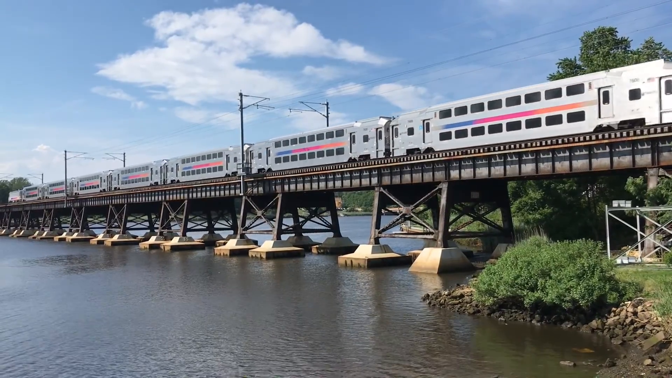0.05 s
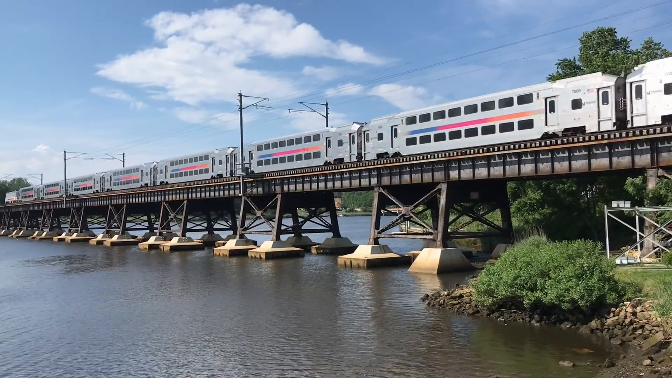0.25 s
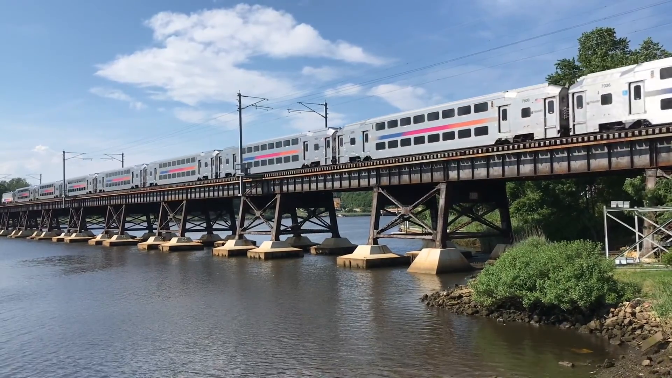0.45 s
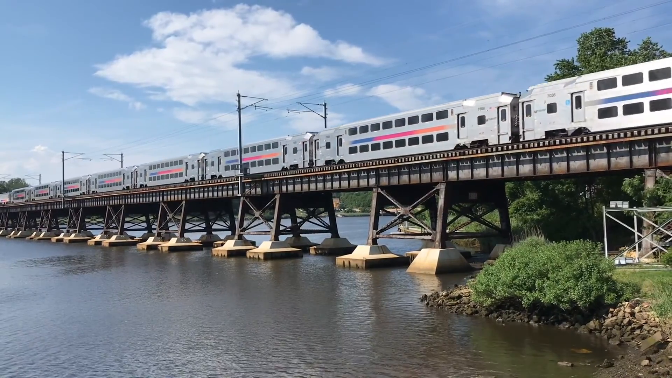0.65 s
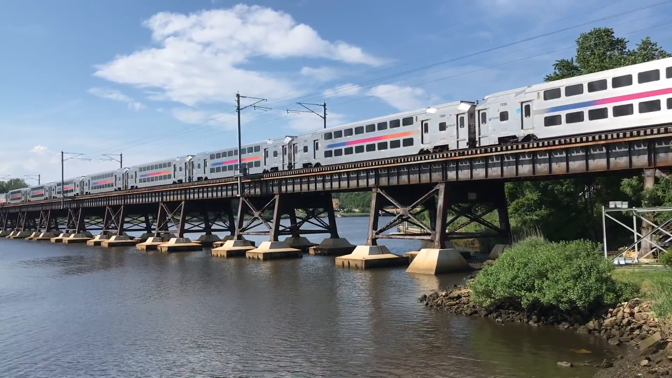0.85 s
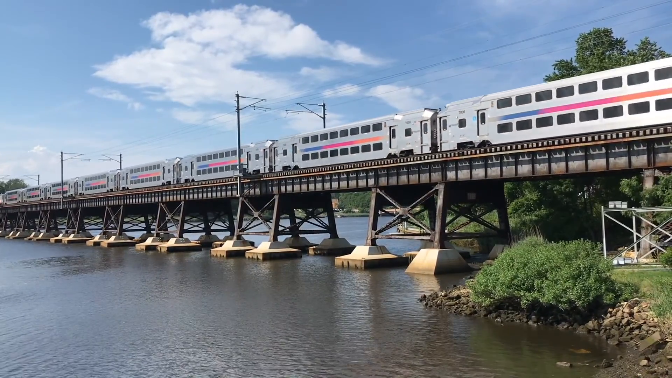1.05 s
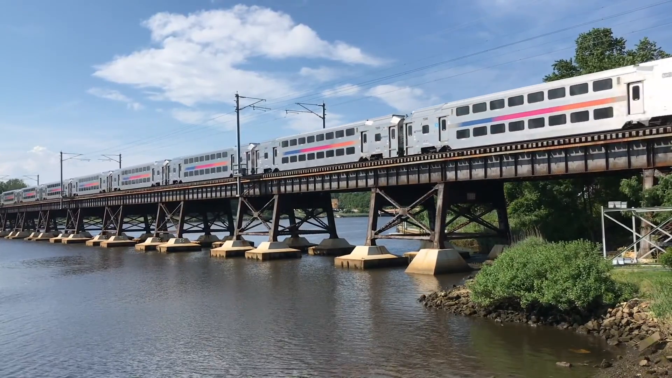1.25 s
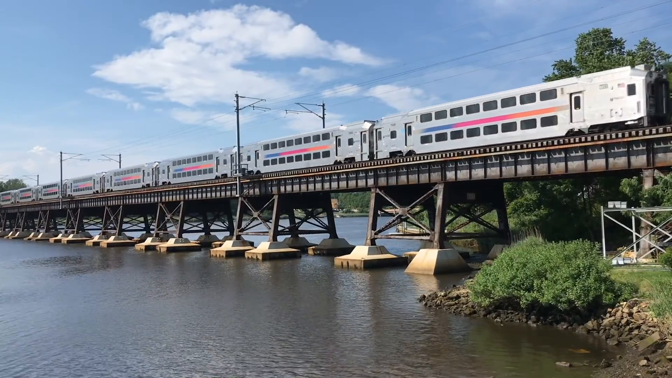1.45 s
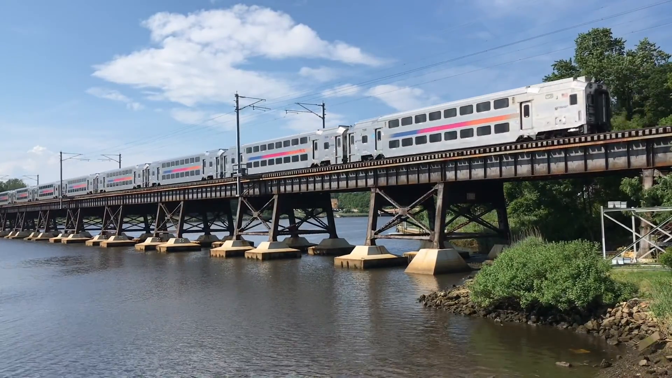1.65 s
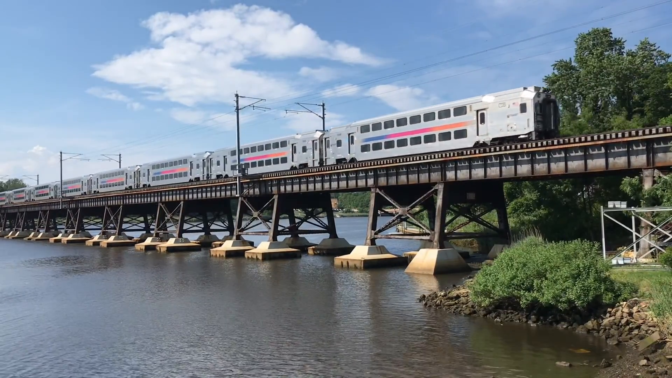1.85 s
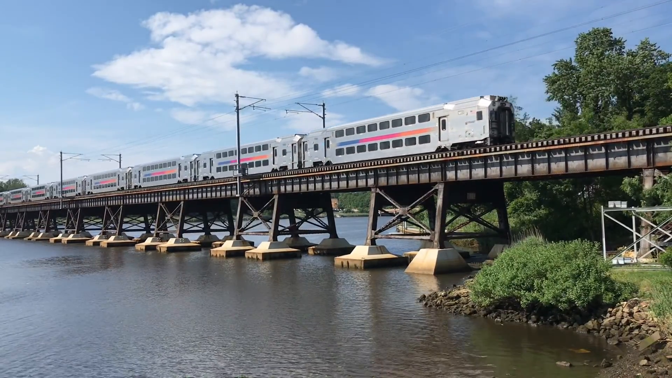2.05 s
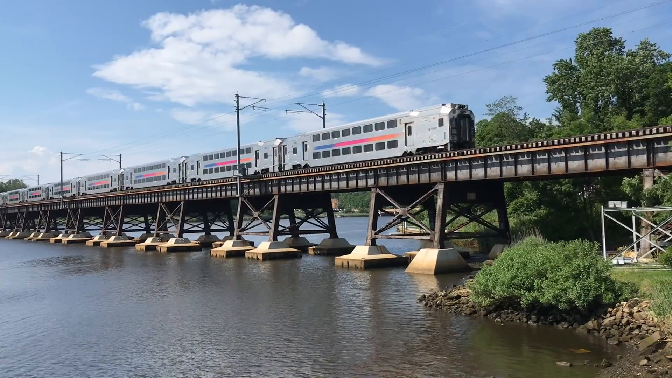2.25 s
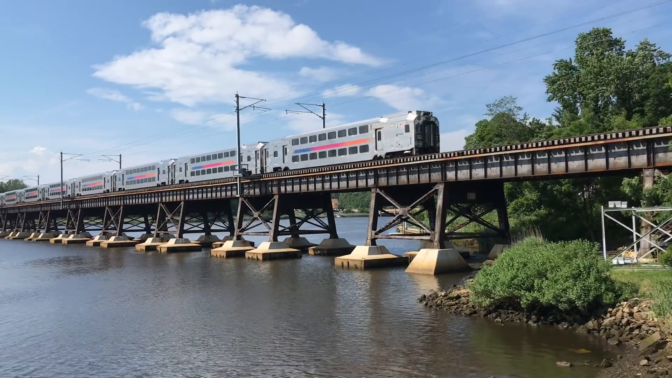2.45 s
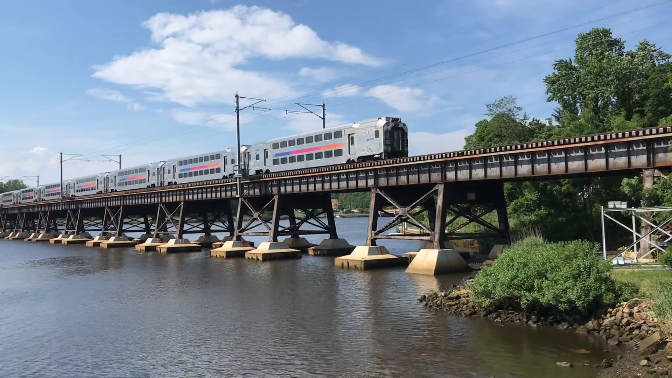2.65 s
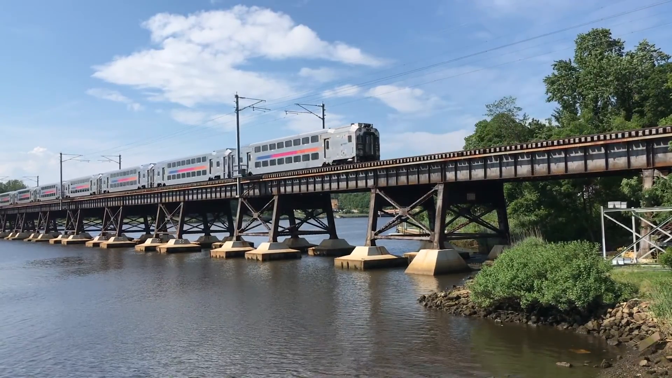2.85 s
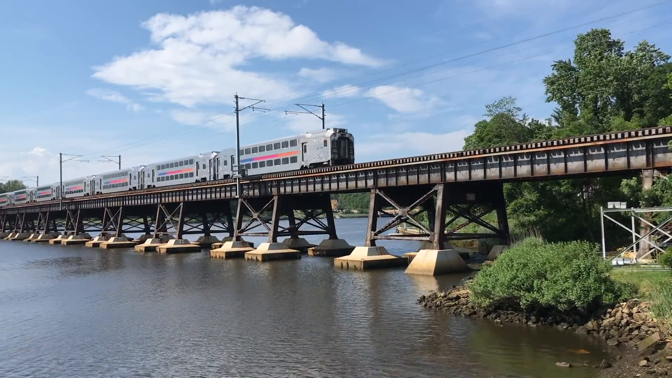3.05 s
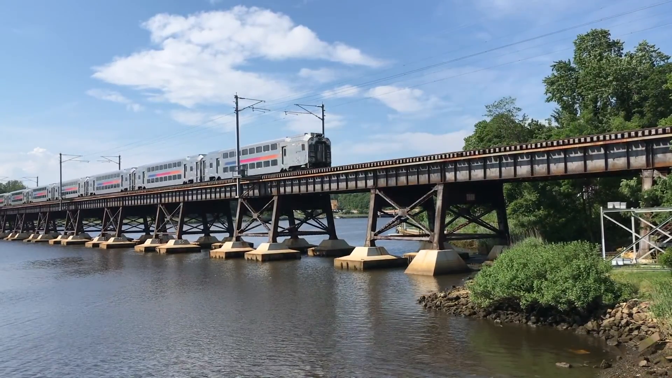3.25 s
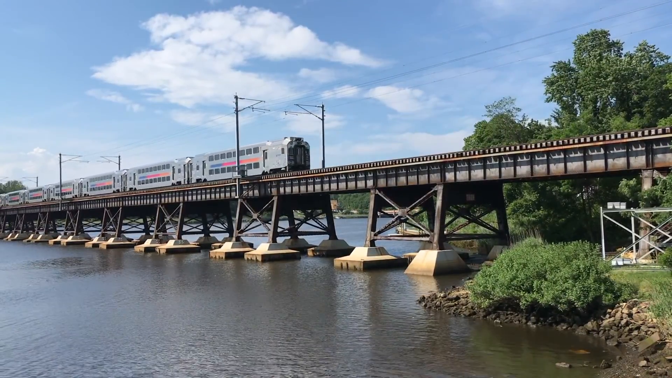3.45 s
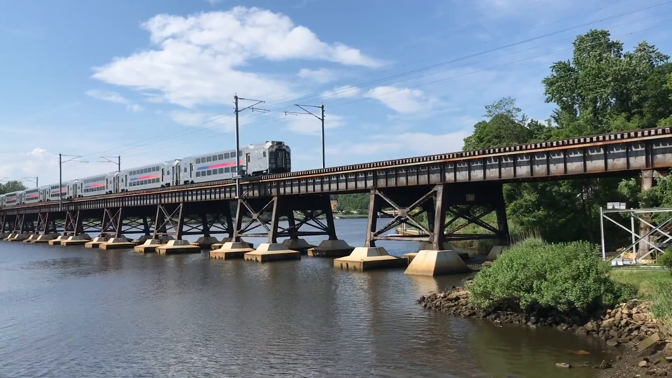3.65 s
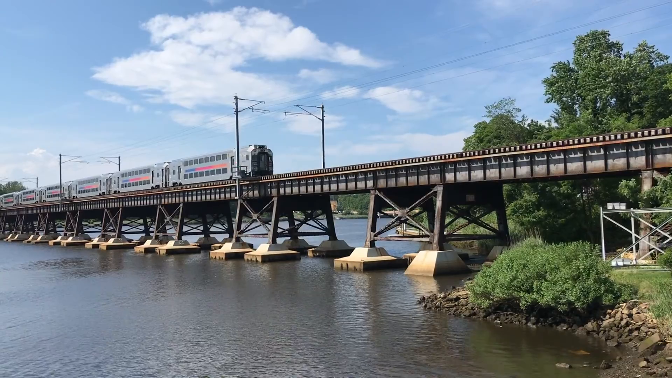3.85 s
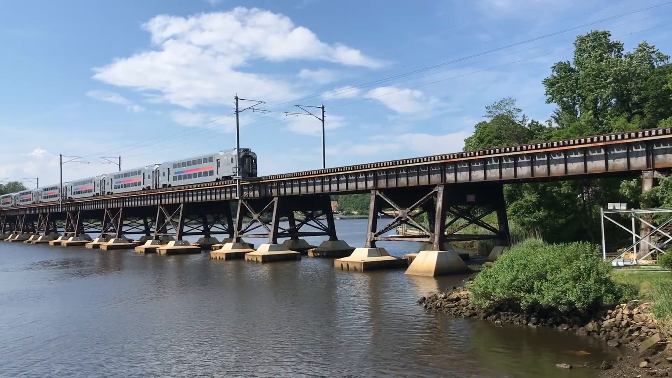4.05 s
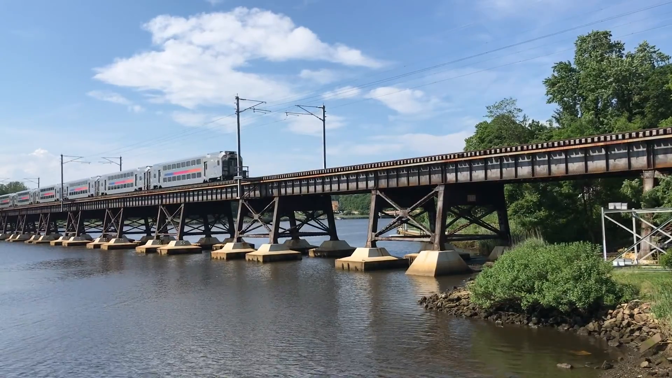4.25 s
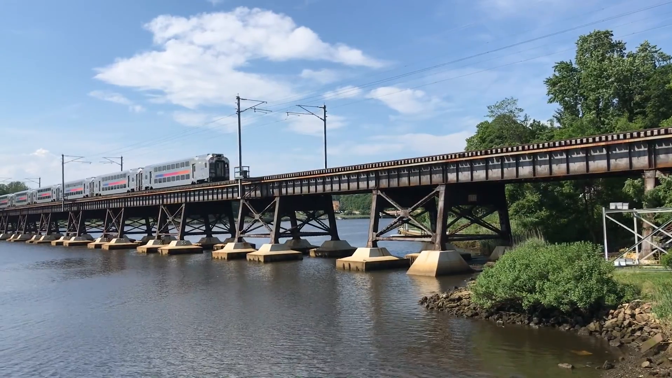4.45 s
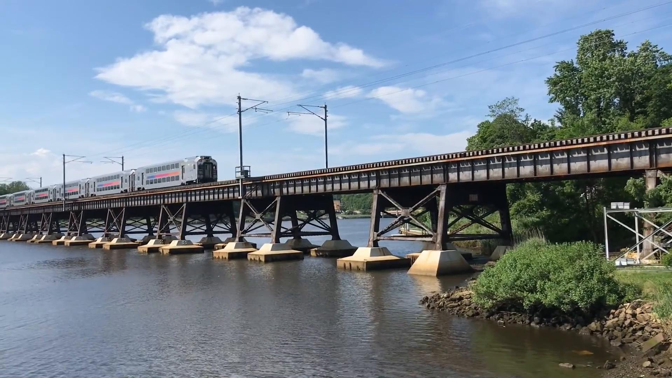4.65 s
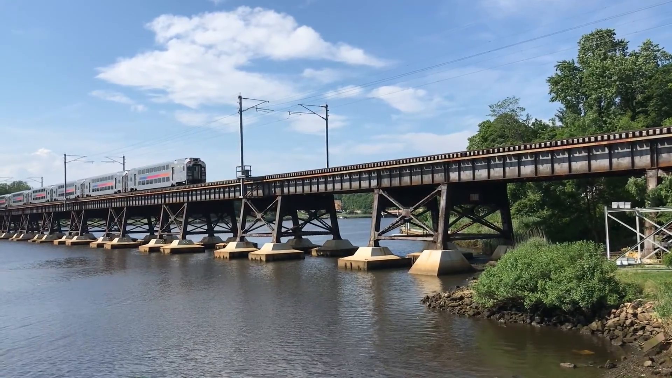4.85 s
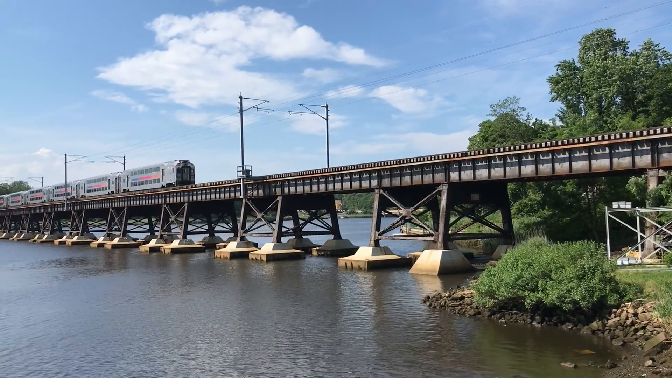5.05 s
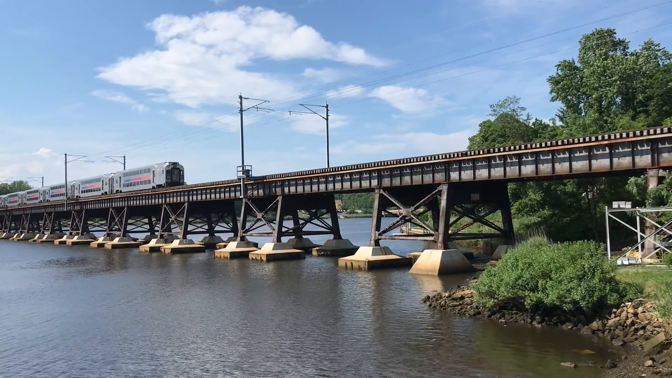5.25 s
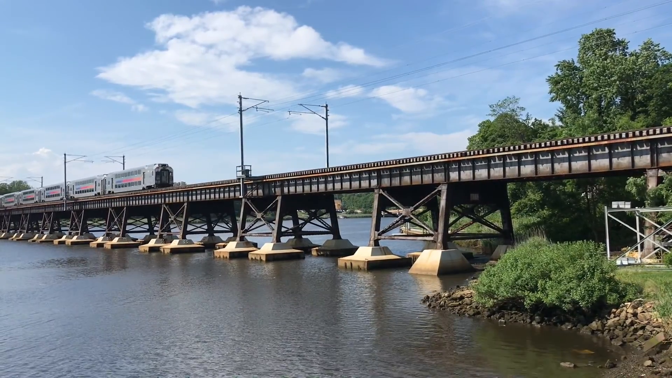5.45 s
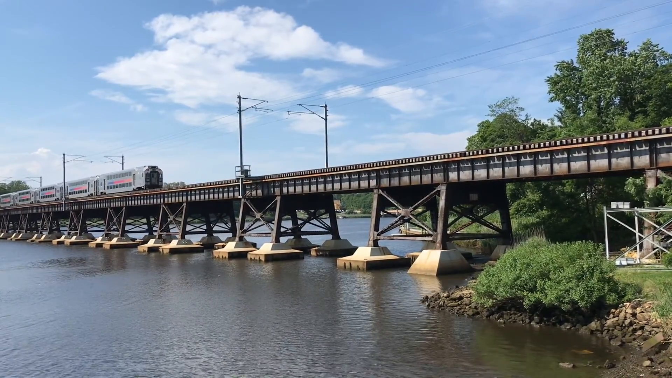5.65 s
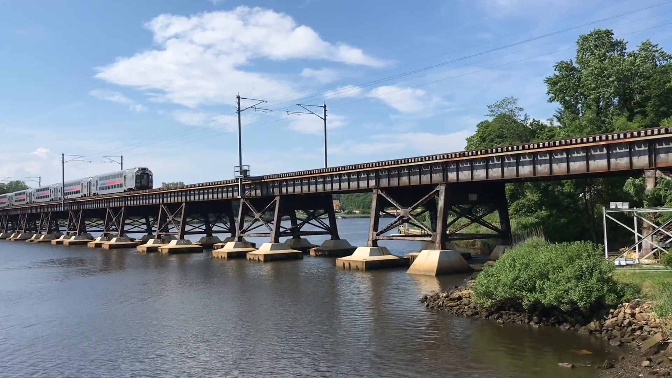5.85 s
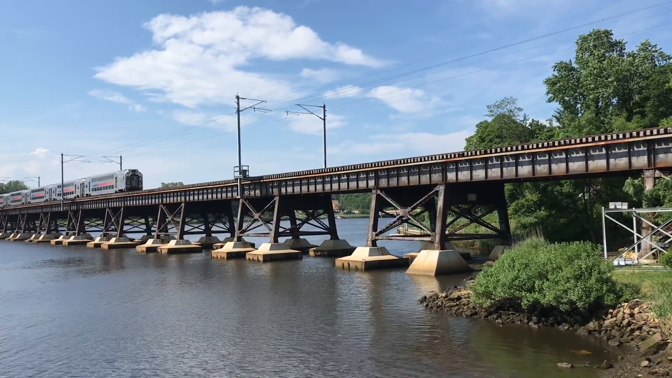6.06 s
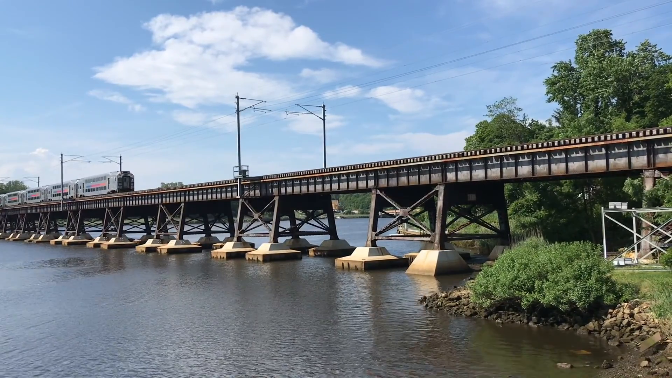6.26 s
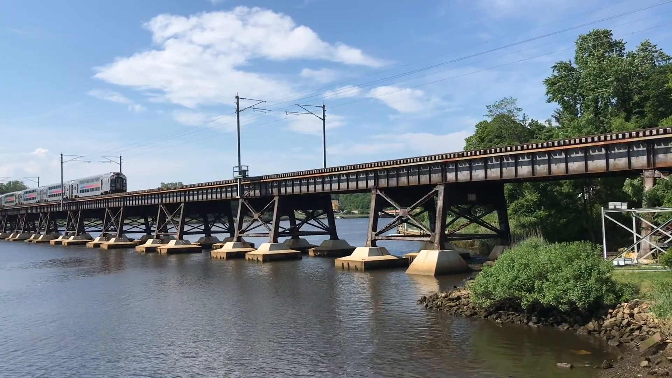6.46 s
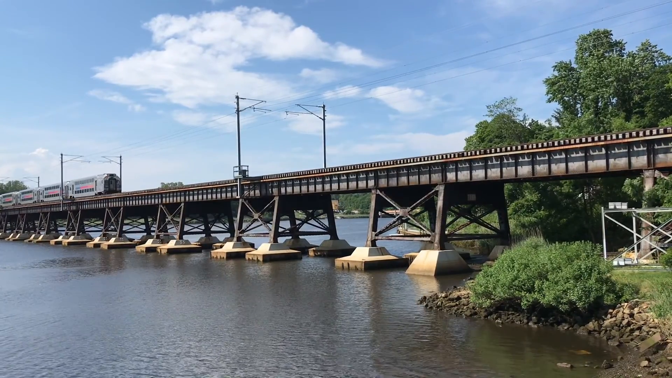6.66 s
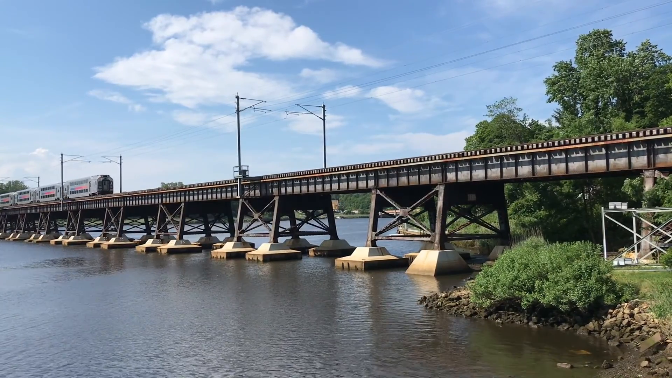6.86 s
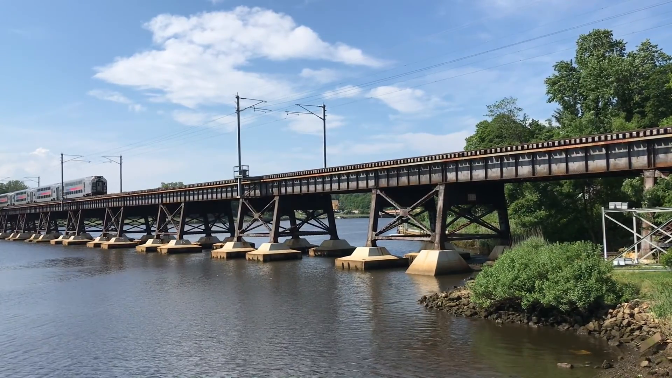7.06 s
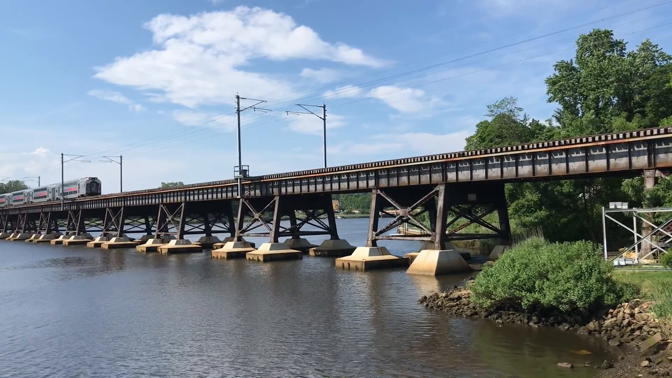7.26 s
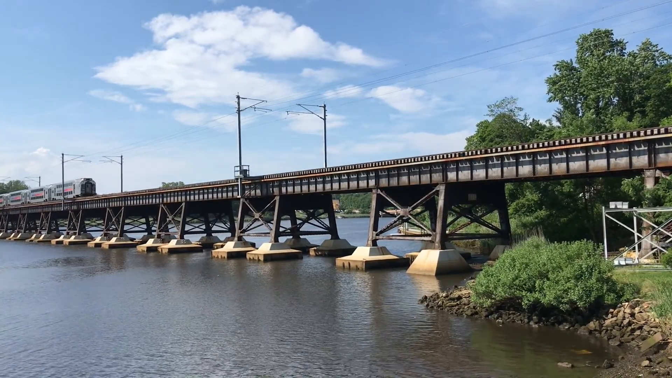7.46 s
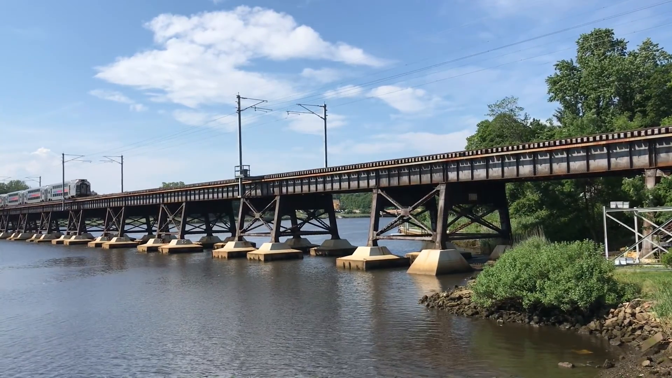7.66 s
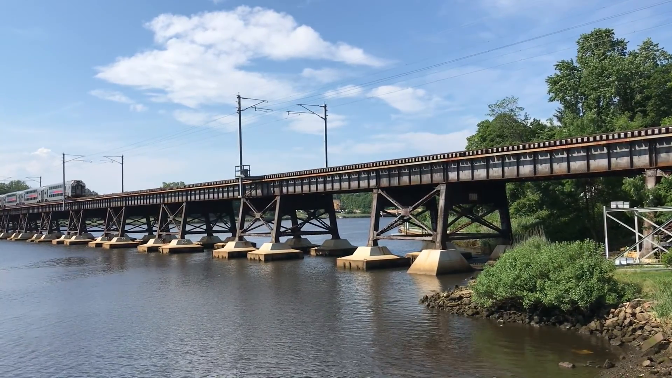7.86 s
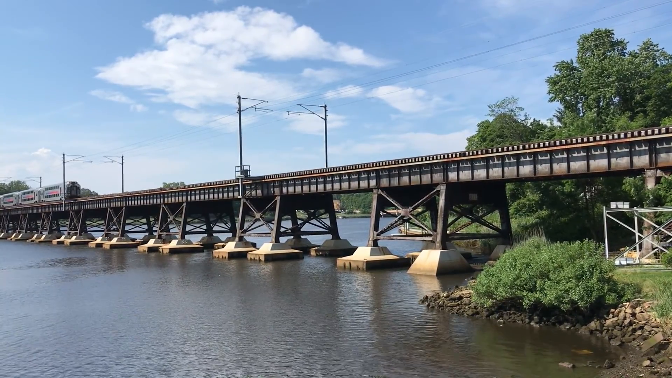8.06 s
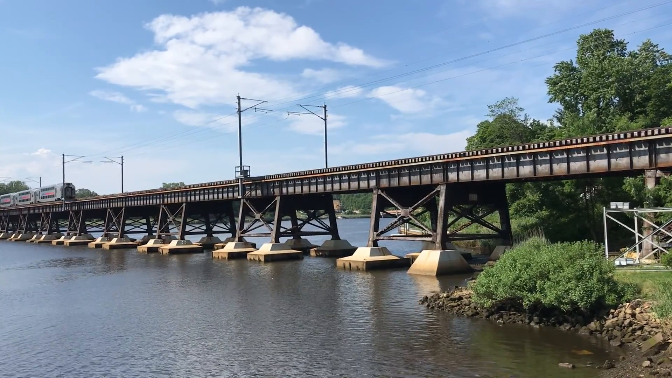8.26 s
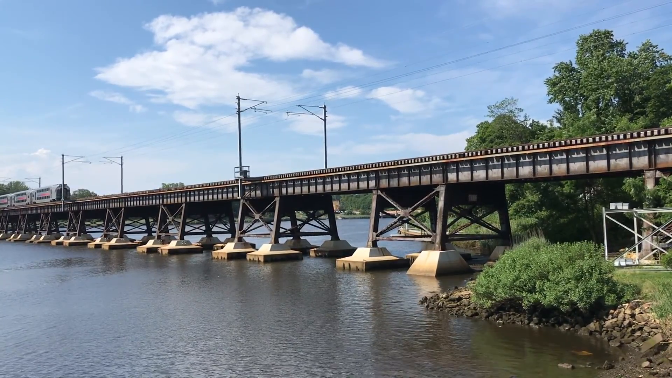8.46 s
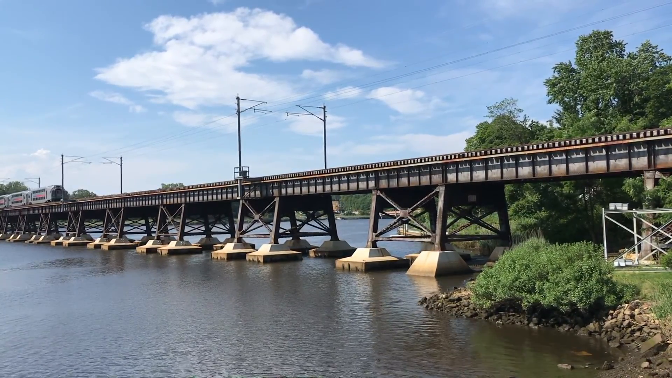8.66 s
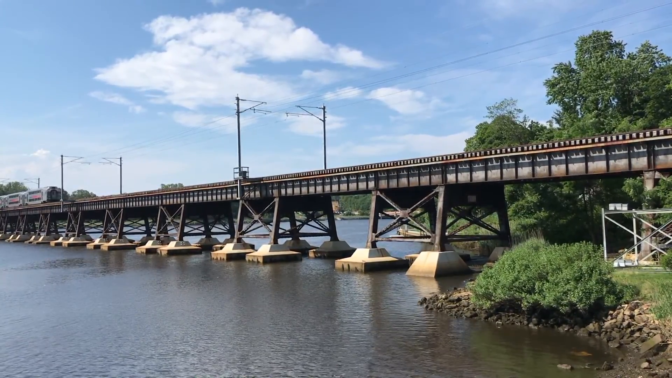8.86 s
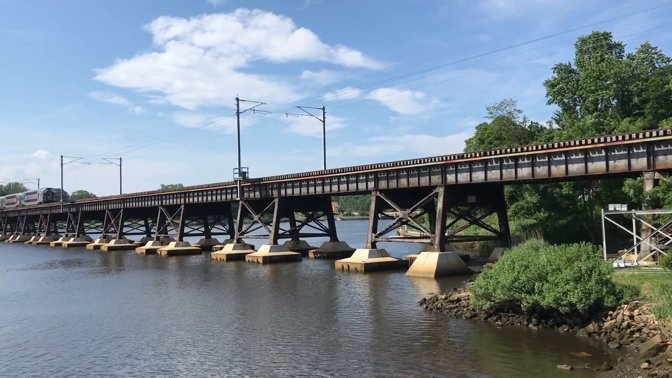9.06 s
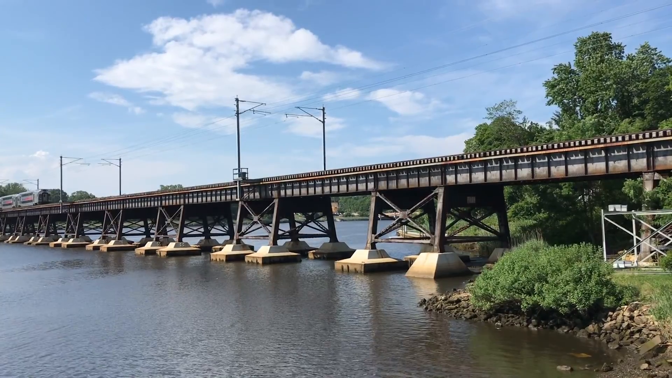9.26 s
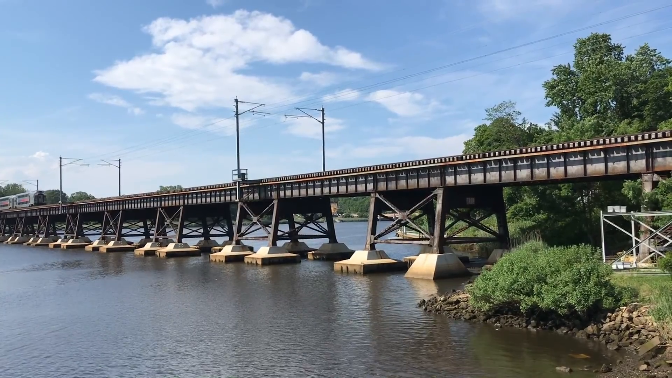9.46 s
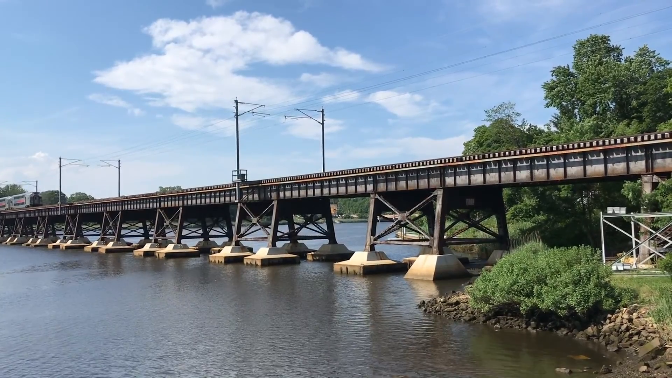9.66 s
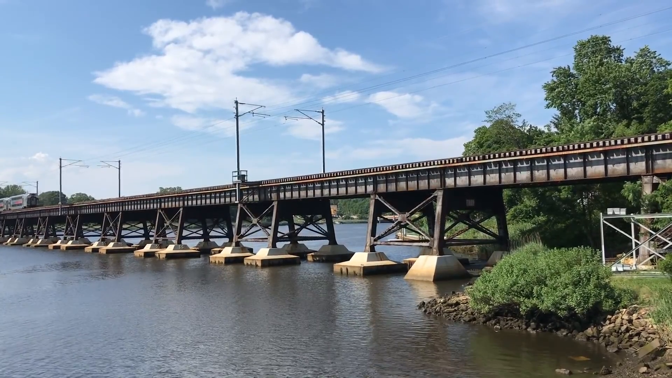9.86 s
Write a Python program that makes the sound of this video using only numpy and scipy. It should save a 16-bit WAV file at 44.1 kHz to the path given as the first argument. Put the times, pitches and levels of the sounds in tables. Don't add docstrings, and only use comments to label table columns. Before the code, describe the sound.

Deep uneven booming and dull roar of a train receding across a steel river bridge, early wheel clacks, faint chirps, road hiss, close knocks at the end.

```python
import sys
import numpy as np
from scipy import signal
from scipy.fft import rfft, irfft
from scipy.io import wavfile
from scipy.ndimage import uniform_filter1d

SR = 44100
rng = np.random.default_rng(int(sys.argv[2]) if len(sys.argv) > 2 else 0)


def put_to_file(sound):
    columns = np.atleast_2d(sound).T
    safe = np.clip(columns, -1, 1)
    whole_steps = np.round(safe * 32767)
    wavfile.write(sys.argv[1], SR, whole_steps.astype(np.int16))


def boost(x):
    u = np.asarray(x, float) / 20
    return 10 ** u


N = 437016
FRAME_S = np.arange(0, N / SR + .01, .01)

# time_s, loss_db
DISTANCE = [(0, -0.5), (2.3, 1.5), (6.2, -1), (7.1, -2.5), (7.6, -4), (8.6, -6.5), (9.91, -6.5)]
# time_s, load_db
RAIL_LOAD = [(0, -1), (.17, -0.5), (.8, 1.5), (1.2, 0.5), (1.7, 6.5), (2.05, 2), (2.35, -3.5), (2.75, 2.5),
             (3.55, 3), (4.1, -2.5), (4.3, 2.5), (5.3, 3.5), (5.78, -2.5), (6.1, 1.5), (6.45, 1),
             (6.8, -3.5), (7.5, -3), (8.0, -3.5)]

# freq_hz, density_db_per_hz
GIRDER_COLOUR = [(15, -41), (30, -26), (44, -3), (88, -3.5), (122, 4), (144, -2.5), (164, -12), (286, -15),
                 (476, -29), (593, -28), (700, -26), (910, -56)]
# start_db, distance_share, load_gain_db
GIRDER_BED = [(-33.5, 0.97, -13.5), (-27.5, 1.0, -0.5), (-22.5, 0.44, 0), (-31.5, 0.38, -21),
              (-36.5, 0.99, -19)]
# crest_s, level_db, length_s
BOOMS = [(0.07, -17.5, 0.017), (0.43, -15.5, 0.06), (0.8, -19.5, 0.103), (0.96, -14, 0.028),
         (1.25, -17.5, 0.09), (1.47, -22.5, 0.047), (1.65, -13.7, 0.03), (1.77, -16.5, 0.056),
         (1.97, -17.5, 0.056), (2.16, -15.5, 0.035), (2.48, -15.5, 0.02), (2.69, -19, 0.045),
         (2.78, -21, 0.012), (3.0, -18.5, 0.088), (3.09, -15, 0.036), (3.41, -17.1, 0.024),
         (3.48, -17.5, 0.028), (3.57, -15.5, 0.019), (3.7, -18.5, 0.077), (4.03, -17, 0.039),
         (4.47, -17.5, 0.026), (4.54, -16.5, 0.018), (4.71, -19, 0.024), (4.81, -25, 0.033),
         (4.93, -17, 0.038), (5.05, -17.5, 0.031), (5.23, -22.5, 0.17), (5.34, -16.2, 0.015),
         (5.46, -18.3, 0.019), (5.63, -15.5, 0.021), (5.72, -14.5, 0.033), (5.86, -21, 0.1),
         (6.03, -17, 0.054), (6.23, -16.5, 0.027), (6.41, -21, 0.052), (6.64, -19, 0.02),
         (7.03, -17.5, 0.091), (7.15, -25, 0.022), (7.25, -23, 0.018), (7.34, -16.5, 0.023),
         (7.41, -18, 0.021), (7.5, -22, 0.045), (7.66, -23.0, 0.03), (7.73, -20, 0.033), (7.95, -19, 0.038),
         (8.03, -18, 0.017), (8.33, -22.5, 0.024), (8.59, -28, 0.031), (8.69, -17, 0.012),
         (8.84, -21, 0.053), (8.96, -19.7, 0.022), (9.14, -29, 0.069), (9.26, -21.5, 0.022),
         (9.36, -21.5, 0.027), (9.53, -25, 0.021), (9.63, -25, 0.043), (9.75, -34, 0.018),
         (9.92, -17.5, 0.03),
         (0.54, -21.5, .05), (.7, -18, 0.033), (1.13, -21, 0.049), (2.245, -19.5, 0.065),
          (2.583, -20.5, .08), (3.907, -24.5, 0.055), (4.2, -20, .08), (4.325, -19.5, .07),
          (8.214, -25.5, .08)]
# crest_s, level_db, length_s
THUDS = [(0.09, -18.5, 0.05), (0.313, -33, 0.035), (0.44, -16, 0.039), (0.59, -22, 0.046),
         (0.767, -15.5, 0.032), (0.99, -23.8, 0.029), (1.18, -20.5, 0.049), (1.39, -20, 0.036),
         (1.505, -18, 0.034), (1.615, -22, 0.029), (1.753, -19.6, 0.029), (2.15, -14, 0.031),
         (2.537, -25, 0.094), (2.7, -20.6, 0.034), (2.84, -21, 0.047), (3.0, -21, 0.088),
         (3.148, -19, 0.028), (3.237, -31, 0.019), (3.44, -18.5, 0.043), (3.646, -25, 0.05),
         (3.855, -25, 0.052), (4.025, -20, 0.032), (4.367, -17, 0.05), (4.547, -20, 0.028),
         (4.752, -19, 0.033), (4.844, -17, 0.025), (4.953, -24, 0.028), (5.103, -35, 0.062),
         (5.25, -33, 0.031), (5.337, -28, 0.023), (5.47, -27, 0.029), (5.65, -21, 0.054),
         (5.756, -16, 0.043), (5.905, -22.5, 0.034), (6.11, -19, 0.032), (6.217, -24.5, 0.035),
         (6.39, -40, 0.07), (6.65, -29, 0.034), (6.775, -27.5, 0.023), (6.96, -28, 0.034),
         (7.07, -21, 0.032), (7.317, -32, 0.026), (7.523, -32, 0.026), (7.7, -35, 0.031),
         (7.945, -34, 0.024), (8.084, -33, 0.041), (8.303, -25, 0.031), (8.48, -29.5, 0.036),
         (8.78, -34.9, 0.025), (8.96, -31.2, 0.022), (9.11, -30.5, 0.044), (9.218, -31.2, 0.032),
         (9.425, -24, 0.035), (9.51, -32.9, 0.025), (9.78, -39, 0.041)]
# crest_s, level_db, length_s
PLATES = [(0.07, -26, 0.061), (0.25, -34.5, 0.027), (0.407, -20, 0.047), (0.62, -23.5, 0.061),
          (0.78, -22, 0.019), (0.91, -22, 0.064), (1.066, -28.5, 0.077), (1.376, -27, 0.045),
          (1.453, -30, 0.024), (1.603, -22, 0.018), (1.817, -19, 0.042), (2.074, -27.5, 0.11),
          (2.345, -27, 0.091), (2.553, -34, 0.02), (2.747, -29, 0.086), (3.07, -27, 0.15),
          (3.17, -29.5, 0.024), (3.32, -22.5, 0.025), (3.467, -25.5, 0.067), (3.714, -30.5, 0.023),
          (3.82, -31, 0.017), (3.897, -26.5, 0.04), (4.06, -28.5, 0.048), (4.333, -26.5, 0.16),
          (4.62, -25.8, 0.025), (4.777, -25, 0.094), (4.97, -26.1, 0.023), (5.244, -26.5, 0.028),
          (5.53, -22, 0.039), (5.697, -24.5, 0.041), (5.91, -27, 0.033), (6.045, -25.5, 0.085),
          (6.33, -26, 0.048), (6.65, -26, 0.031), (6.858, -24, 0.039), (6.947, -20.5, 0.029),
          (7.07, -26.7, 0.03), (7.257, -34.5, 0.042), (7.573, -27, 0.063), (7.69, -33.5, 0.049),
          (8.01, -32.5, 0.11), (8.396, -31.5, 0.032), (8.68, -33, 0.087), (8.895, -31, 0.019),
          (9.12, -32, 0.045), (9.198, -27.5, 0.017), (9.388, -27, 0.07), (9.537, -29, 0.028),
          (9.65, -31.5, 0.032), (9.734, -29.5, 0.025)]
PLATE_DB = [-0.5, -8]
# centre_s, depth_db
LULLS = [(.2, -3), (1.01, -11), (1.41, -7), (2.82, -6), (3.05, -4), (3.66, -5), (4.1, -1), (5.28, -7),
         (5.4, -5), (5.81, -7), (6.28, -3), (6.72, -5), (7.29, -7), (7.85, -9), (8.5, -3), (8.91, -5),
         (9.02, -6), (9.29, -5), (9.84, -7)]
# centre_s, depth_db
DEEP_LULLS = [(.37, -12), (1.45, -5), (2.09, -7), (3.73, -6), (3.92, -5), (4.27, -6), (4.67, -6),
              (4.91, -9), (6.31, -8), (6.47, -6), (6.87, -7), (7.27, -6), (7.4, -7), (7.57, -7), (7.89, -5),
              (8.18, -5), (8.91, -8), (9.56, -6), (9.83, -5)]
LULL_S = 0.024
PIER_AXLE_DB, PIER_AXLE_S, PIER_EDGE_HZ = -20, 0.078, 58.6

# freq_hz, density_db_per_hz
ROLLING_COLOUR = [(180, -30), (300, -19), (371, 3.5), (441, -11), (593, -7), (764, -10.5), (872, -10.5),
                  (1340, -13.5), (1830, -16), (2250, -22), (2890, -30.5), (3400, -27), (4420, -57),
                  (7480, -120)]
ROLLING_EDGES_HZ = [420, 900, 1500, 2600]
# start_db, distance_share, rail_load_share
ROLLING_BED = [(-37, 1, 0.15), (-38, 0.3, 0.66), (-40.5, 0.9, 0.87), (-50, 0.99, 0.072), (-57, 0.7, 0.13),
               (-65, 1, .1), (-68.5, 0.68, .1)]
# crest_s, level_db, length_s
FAR_JOINTS = [(2.19, -35, 0.037), (2.638, -45, 0.027), (2.85, -50, .08), (2.992, -36.5, 0.1),
              (3.43, -34.5, 0.071), (4.283, -34.5, 0.12), (4.77, -32, 0.092), (5.29, -37.5, 0.11),
              (5.633, -34.5, 0.11), (6.06, -34, .1), (6.6, -38, 0.063), (6.937, -33.5, 0.14),
              (8.422, -41, 0.04)]
FAR_JOINT_DB = [-1, -4.5, -13.5]

# start_s, clatter_db, sleeper_thud_db, rail_crack_db, web_ring_db, rim_ring_db
AXLES = [(0.35, -38.5, -27.5, -27.5, -16, -14), (0.486, -40, -28, -29.5, -6, 6),
         (.755, -39, -26.5, -32, 16, -4), (0.883, -39.5, -29.5, -29.5, 15, 6),
         (1.668, -40, -28.5, -32.5, 0, 9), (1.803, -37, -28, -30, 6, 9)]
# freq_hz, density_db_per_hz
CLACK_COLOUR = [(88, -31), (150, -7.5), (404, 2), (501, -10), (970, -12), (1490, -19.5), (2770, -33.5),
                (4250, -28.5), (7770, -41), (9430, -39.5), (10400, -52), (12100, -45), (15600, -50)]
# freq_hz, t60_s
CLACK_T60 = [(2000, 0.83), (5000, 1), (9000, 1), (15000, 0.61)]
# freq_hz, width_hz, level_db, t60_s
RAIL_RINGS = [(3500, 700, -16, .5), (4300, 500, -16, .5), (5290, 400, -22, .5), (13370, 100, -36, 2.2),
              (11450, 150, -36, 2.5), (14500, 1500, -27, .3)]
# freq_hz, width_hz, level_db, t60_s
WEB_RING = (9510, 500, -27, .2)
# freq_hz, width_hz, level_db, t60_s
RIM_RINGS = [(11780, 600, -23, .25), (12500, 800, -27, .25), (11600, 300, -42, 1.6)]
# freq_hz, density_db_per_hz
THUD_COLOUR = [(300, -6), (382, 0), (472, -7), (972, -10), (1220, -15), (1470, -10.5), (2060, -22.5),
               (2600, -33)]
CLACK_RISE_S, THUD_T60_S, CRACK_T60_S = 0.027, 0.68, 0.3

# start_s, body_db, body_hz, snap_db, rattle_db
KNOCKS = [(9.334, -28, 1100, -56, -36), (9.358, -14, 1250, -36, -26), (9.4879, -18, 1050, -56, -31),
          (9.5117, -15, 1120, -31, -25), (9.5115, -23, 2000, -60, -40), (9.3578, -24, 2100, -60, -40),
          (9.549, -23, 1100, -58, -34), (9.372, -22, 1300, -48, -31)]
# freq_hz, width_hz, level_db
RATTLE = [(800, 500, -4), (1200, 600, 0), (1750, 800, -4), (3900, 1500, -20), (6300, 2000, -20),
          (10500, 2000, -32)]
# start_s, peak_db, pitch_hz, length_cycles
TICKS = [(8.235, -42, 5300, 5), (8.2355, -43, 3600, 5), (8.309, -39, 3750, 8), (8.3956, -38, 5500, 3),
         (8.4568, -40, 6500, 4), (8.4737, -37, 3650, 6), (8.572, -36, 3750, 7), (8.8055, -45, 8000, 5),
         (9.092, -46, 7000, 4), (9.1755, -51, 13000, 6), (9.2713, -41, 7500, 3), (9.5248, -35, 5600, 6),
         (9.5246, -34, 3900, 5), (8.545, -29, 660, 7), (8.521, -32, 750, 6), (3.797, -43, 5400, 40)]

# note_start_s, level_db, pitch_factor, slur_db, end_db, slur_top_hz
CHIRPS = [(.810, -43, .97, -2, 0, 5000), (2.404, -40, .97, -2, -5, 4750), (3.862, -41, .975, 2, -5, 4950),
          (4.853, -44, .96, 2, 2, 4750), (6.258, -39, .98, -1, 0, 5000), (7.205, -41, 1.0, 2, 2, 5200)]
# time_from_note_s, pitch_hz, level_db
SLUR = [(-.075, 4600, -24), (-.068, 5100, -8), (-.05, 4600, -4), (-.036, 4200, -2), (-.027, 3650, -8),
        (-.023, 3500, -20), (-.012, 3640, -9), (-.005, 3660, -22)]
# time_s, pitch_hz, level_db
NOTE = [(0, 3550, -14), (.008, 3650, 4), (.02, 3740, 7), (0.028, 3700, 4), (.036, 3300, 4),
        (.043, 3140, -10), (.048, 3100, -38)]

# freq_hz, density_db_per_hz
HISS_COLOUR = [(1060, -30), (1800, 0), (2880, -14), (3450, -16), (4370, -17), (5000, -22), (7120, -24),
               (10200, -36), (11900, -35), (14500, -40), (15600, -43)]
HISS_EDGES_HZ = [2600, 4900, 7400, 10300, 17600]
# crest_s, level_db, length_s, tilt_db_per_band
BOGIES = [(0, -46.5, 0.39, 2), (.52, -43, 0.15, 2.5), (.92, -45, 0.32, 2.5), (1.8, -43, 0.16, 3.5),
          (2.1, -46.5, 0.26, 2.5)]
BOGIE_DB = [16, 5, -5, 0, -10, -19, -27]
# crest_s, level_db, length_s, tilt_db_per_band
TYRES = [(3.8, -55.5, 0.26, -1.5), (4.37, -53.5, 0.11, 2), (4.8, -52.5, 0.13, 3), (5.1, -55.5, .15, 2.5),
         (5.3, -54, 0.09, 2), (5.52, -52, 0.16, 3), (5.8, -56, 0.12, 0), (6.08, -51.5, 0.33, 0.5),
         (7.0, -57, 0.19, 4), (9.45, -62, 0.11, 2), (10.0, -51.5, 0.33, -3)]
TYRE_DB = [-4, 4, -5, 2.5, -6, -14, -27.5]
# crest_s, level_db, length_s, tilt_db_per_band
ROAD = [(7.5, -51, 0.092, -5), (8.35, -40, 0.11, 2), (8.8, -40, 0.33, 1), (9.5, -34.5, 0.42, 0.5)]
ROAD_DB = [-8, -0.5, -4, -21.5, -33, -34, -46]
# crest_s, level_db, length_s
WHINES = [(1.15, -54, .2), (2.1, -52, .2), (3.92, -52, .15), (5.35, -47, .14), (5.55, -50, .14),
          (9.9, -50, .3)]
# freq_hz, width_hz, level_db
TREAD = [(3500, 1000, 1), (4200, 1000, -4), (7200, 1800, -15)]
# crest_s, level_db, length_s
GUSTS = [(5.1, -72, .08), (5.53, -65, .12), (6.08, -71, .12), (6.35, -70, .08), (6.55, -72, .2)]
# freq_hz, width_hz, level_db
LEAVES = [(8600, 2000, 0), (11700, 1400, -1), (13200, 2000, -1), (14800, 1200, -7)]
# freq_hz, width_hz, level_db
MIC_DIPS = [(2610, 450, 0), (4840, 88, -3.5), (10800, 250, -0.5), (10850, 220, 0.5)]
MIC_CUT_HZ, MIC_TOP_HZ = 42.6, 15700


def evened(x):
    return x / np.sqrt(np.mean(x ** 2) + 1e-20)


def read(points, hz):
    f, value = np.transpose(points)
    return np.interp(np.log(hz + 1), np.log(f + 1), value)


def follow(curve):
    return np.interp(FRAME_S, *np.transpose(curve))


def add(mix, s, sound):
    part = mix[round(s * SR):][:len(sound)]
    part += sound[:len(part)]


def swell(s, db, length_s):
    return boost(db) ** 2 / (1 + ((FRAME_S - s) / max(length_s, .01)) ** 2) ** 2


def swells(rows):
    return sum(swell(*row) for row in rows)


def lull_db(rows):
    return sum(db * np.exp(-((FRAME_S - s) / LULL_S) ** 2) for s, db in rows)


def noise(colour, lo_hz, hi_hz, size=N):
    hz = np.fft.rfftfreq(size, 1 / SR) + 1

    def edge(f):
        return np.clip(np.log2(hz / f) / .3 + .5, 0, 1) * np.pi / 2

    gain = boost(read(colour, hz)) * np.sin(edge(lo_hz)) * np.cos(edge(hi_hz))
    return evened(irfft(rfft(rng.standard_normal(size)) * gain, size))


def smooth(x, size):
    return uniform_filter1d(uniform_filter1d(x, size), size)


def layers(colour, edges_hz, levels_db, steady_s, patchy_db):
    out, t = np.zeros(N), np.arange(N) / SR
    for lo, hi, db in zip(edges_hz, edges_hz[1:], levels_db):
        band = noise(colour, lo, hi)
        drift = smooth(band ** 2, int(steady_s * SR))
        patches = evened(smooth(rng.standard_normal(N), 1500))
        steady = band / np.sqrt(abs(drift) + 0.031)
        out += evened(steady * boost(patchy_db * patches)) * boost(np.interp(t, FRAME_S, db))
    return out


def ring(t, hz, width_hz, db, t60_s):
    r = np.exp(-np.pi * width_hz / SR)
    drive = rng.standard_normal(len(t)) + 1j * rng.standard_normal(len(t))
    slow = signal.lfilter([1], [1, -2 * r, r * r], drive)
    return boost(db - 60 * t / t60_s) * evened((slow * np.exp(2j * np.pi * hz * t)).real)


def girders():
    loss = follow(DISTANCE)
    boom, thud, plates = swells(BOOMS), swells(THUDS), swells(PLATES)
    piers = sum(swell(s + PIER_AXLE_S, PIER_AXLE_DB, PIER_AXLE_S) for s, *_ in AXLES)
    low_plates, high_plates = boost(np.c_[PLATE_DB]) ** 2 * plates
    loads = [thud, thud, boom, boom, boom]
    extras = [piers, 0, 0, low_plates, high_plates]
    levels = []
    for (db, share, load_db), load, extra in zip(GIRDER_BED, loads, extras):
        power = boost(db + share * loss) ** 2 + boost(load_db) ** 2 * load + extra
        levels.append(10 * np.log10(power))
    levels[1] += lull_db(DEEP_LULLS)
    levels[2] += lull_db(LULLS)
    edges_hz = [10, PIER_EDGE_HZ, 85, 160, 290, 420]
    return layers(GIRDER_COLOUR, edges_hz, levels, steady_s=.03, patchy_db=.1)


def band_levels():
    loss, load = follow(DISTANCE), follow(RAIL_LOAD)
    power = np.array([boost(db + far * loss + hard * load) ** 2 for db, far, hard in ROLLING_BED])
    power[:3] += boost(np.c_[FAR_JOINT_DB]) ** 2 * swells(FAR_JOINTS)
    step = np.c_[range(len(ROLLING_BED))] - 3
    for rows, colour_db in [(BOGIES, BOGIE_DB), (TYRES, TYRE_DB), (ROAD, ROAD_DB)]:
        for s, db, length_s, tilt_db in rows:
            power += swell(s, db, length_s) * boost(np.c_[colour_db] + tilt_db * step) ** 2
    return 10 * np.log10(power)


def rolling():
    return layers(ROLLING_COLOUR, ROLLING_EDGES_HZ, band_levels()[:3], steady_s=0.32, patchy_db=0.84)


def clack(db, thud_db, crack_db, web_db, rim_db):
    t = np.arange(SR) / SR
    hz, frames, z = signal.stft(noise(CLACK_COLOUR, 2600, HISS_EDGES_HZ[-1], size=SR), SR, nperseg=256)
    decay = boost(-60 * frames / read(CLACK_T60, hz)[:, None])
    clatter = signal.istft(z * decay, SR, nperseg=256)[1][:SR]
    rings = sum(ring(t, *row) for row in RAIL_RINGS)
    rings += boost(web_db) * ring(t, *WEB_RING)
    rings += boost(rim_db) * sum(ring(t, *row) for row in RIM_RINGS)
    crest = 1 + 0.078 * np.exp(-(np.maximum(t - CLACK_RISE_S, 0) / 0.092) ** 2)
    rise = np.sin(np.clip(t / CLACK_RISE_S, 0, 1) * np.pi / 2) ** 2
    fade = np.clip((1 - t) * 5, 0, 1)
    thud_fall = boost(thud_db - 60 * np.maximum(t - .05, 0) / THUD_T60_S)
    crack_fall = boost(crack_db - 60 * np.maximum(t - .035, 0) / CRACK_T60_S)
    thud = noise(THUD_COLOUR, 334, 880, size=SR) * thud_fall
    thud += noise(THUD_COLOUR, 910, 2360, size=SR) * crack_fall
    return boost(db) * (clatter + 2 * rings) * crest * rise * fade + thud * np.clip(t / 0.014, 0, 1)


def knock(body_db, body_hz, snap_db, rattle_db):
    density = .03
    grit = rng.standard_normal(2200) * (rng.random(2200) < density)
    grit *= boost(rattle_db - 60 * np.arange(2200) / SR / .25)
    bounce = sum(tick(db, hz, 2 * hz / width) for hz, width, db in RATTLE)
    bounce = bounce / np.linalg.norm(bounce) / np.sqrt(density)
    rattle = np.convolve(grit, bounce)[:1800] * np.hanning(3600)[1800:]
    snap = tick(snap_db, 6200, 4.5) + tick(snap_db - 11, 10500, 9)
    return tick(body_db, body_hz, 4.2) + snap + rattle


def tick(db, hz, cycles):
    turns = np.arange(1800) / SR * hz
    u = 4 * turns / cycles
    return boost(db) * np.sin(2 * np.pi * turns) * u * np.exp(1 - u)


def chirp(db, pitch, slur_db, end_db, top_hz):
    s, hz, level = np.transpose(SLUR + NOTE)
    t = np.arange(s[0], s[-1], 1 / SR)
    flutter = rng.standard_normal((2, len(t)))
    shake, waver = (evened(np.convolve(v, np.hanning(160), "same")) for v in flutter)
    rough = np.interp(t, [-.02, 0], [.5, .3])
    bend = np.interp(t, [-.068, -.045, -.03, -.02], [top_hz / hz.max(), 1, 1, pitch])
    turns = np.cumsum(bend * np.interp(t, s, hz) * (1 + .04 * rough * waver)) / SR
    parts_db = np.interp(t, [-.006, -.004, .027, .034], [slur_db, 0, 0, end_db])
    gain = boost(db + np.interp(t, s, level) + parts_db)
    tone = np.sin(2 * np.pi * turns) * (1 + rough * shake) * gain
    echo = rng.standard_normal(3000) * boost(-31 - 60 * np.arange(3000) / SR / .13)
    echo[0] = 1
    return signal.fftconvolve(tone * signal.windows.tukey(len(t), .1), echo)


def hiss():
    return layers(HISS_COLOUR, HISS_EDGES_HZ, band_levels()[3:], steady_s=0.19, patchy_db=1.0)


def resonant_noise(rows, resonances):
    t = np.arange(N) / SR
    tone = sum(ring(t, hz, width, db, t60_s=np.inf) for hz, width, db in resonances)
    return tone * np.interp(t, FRAME_S, np.sqrt(swells(rows)))


def tread_whine():
    return resonant_noise(WHINES, TREAD)


def leaves():
    return resonant_noise(GUSTS, LEAVES)


def scene():
    mix = girders() + rolling() + hiss() + tread_whine() + leaves()
    for s, *row in AXLES:
        add(mix, s, clack(*row))
    for s, *row in KNOCKS:
        add(mix, s, knock(*row))
    for s, *row in TICKS:
        add(mix, s, tick(*row))
    for s, *row in CHIRPS:
        add(mix, s + SLUR[0][0], chirp(*row))
    return mix[None]


def top_cut(x):
    return signal.sosfilt(signal.butter(12, 15790, fs=SR, output="sos"), x)


def record(dry):
    hz = np.fft.rfftfreq(N, 1 / SR)
    colour = boost(sum(db * np.exp(-((hz - f) / width) ** 2) for f, width, db in MIC_DIPS))
    colour = colour / np.sqrt(1 + (MIC_CUT_HZ / (hz + 1)) ** 12 + (hz / MIC_TOP_HZ) ** 200)
    heard = np.tanh(irfft(rfft(dry) * colour, N))
    return top_cut(heard)


dry = scene()
out = record(dry)
put_to_file(out)
```